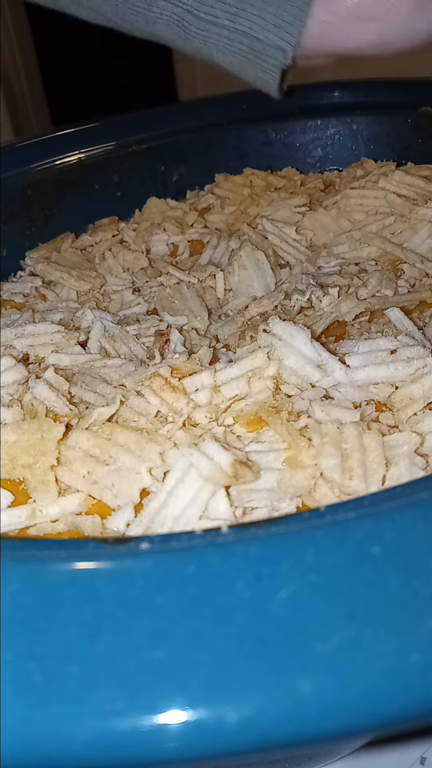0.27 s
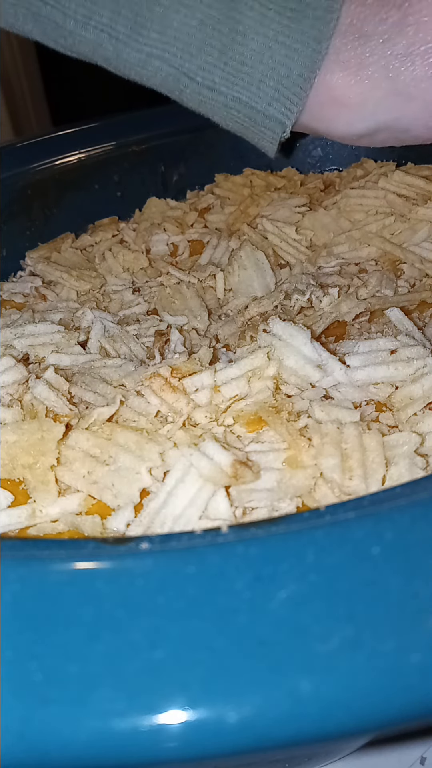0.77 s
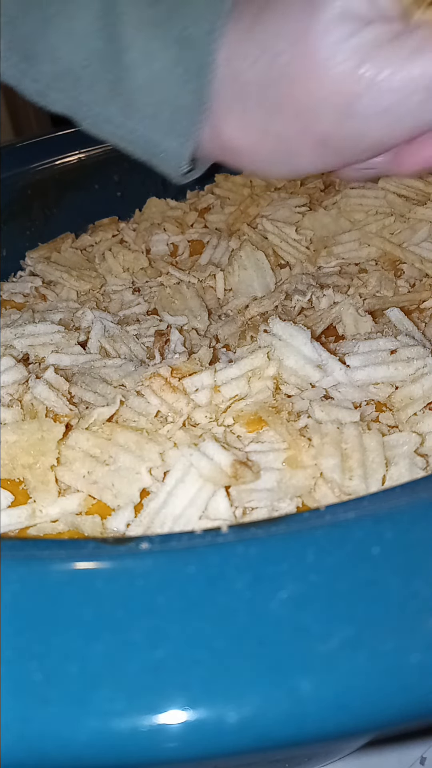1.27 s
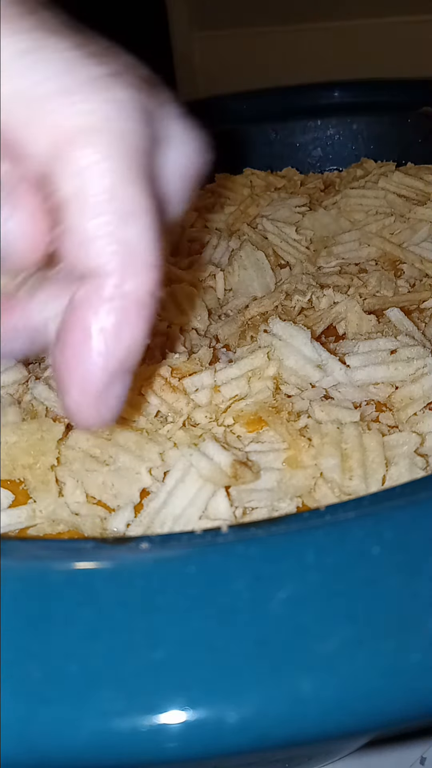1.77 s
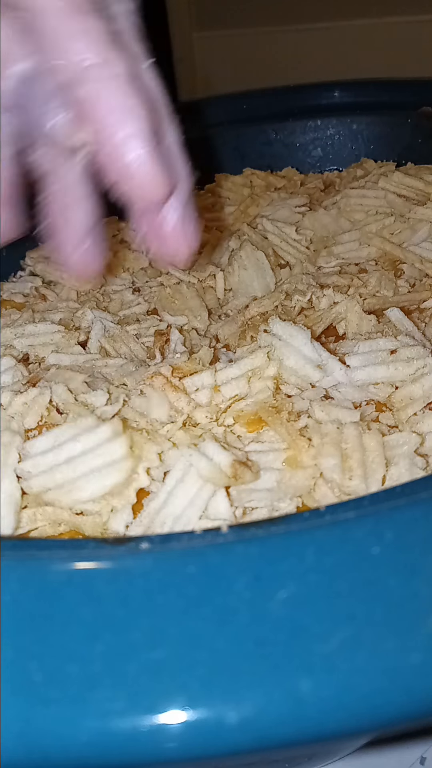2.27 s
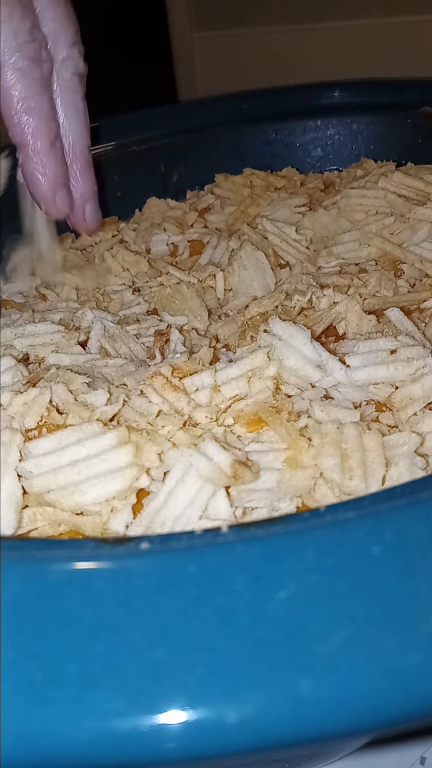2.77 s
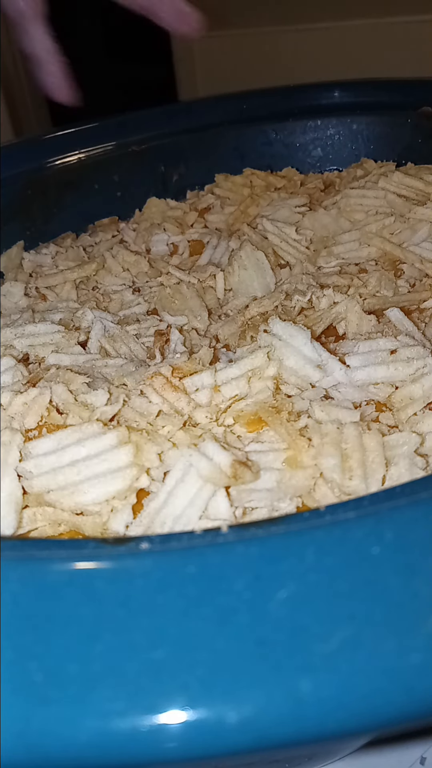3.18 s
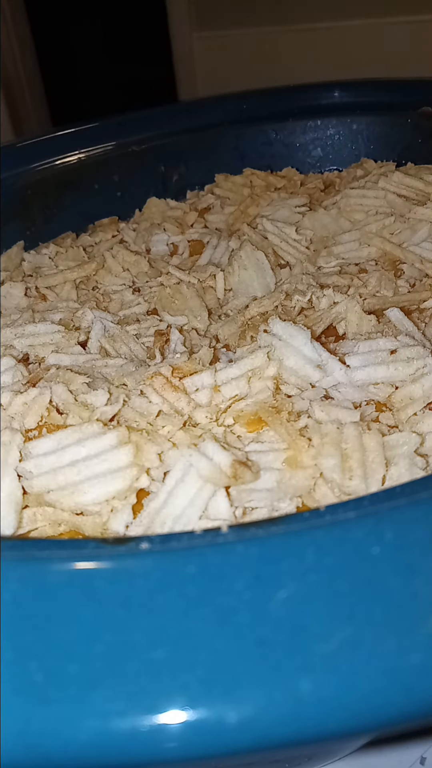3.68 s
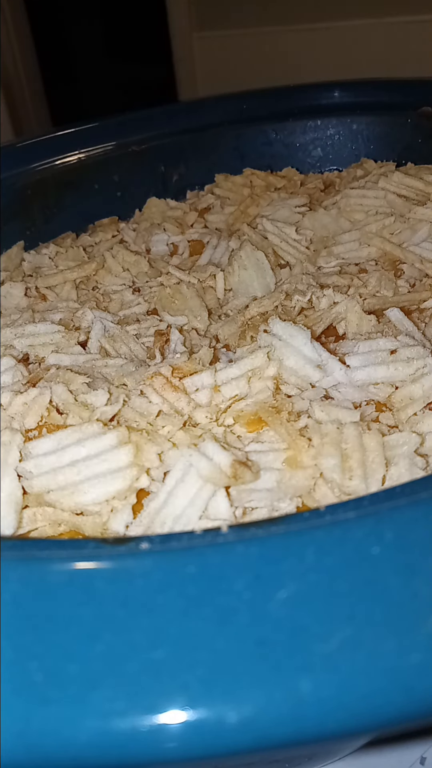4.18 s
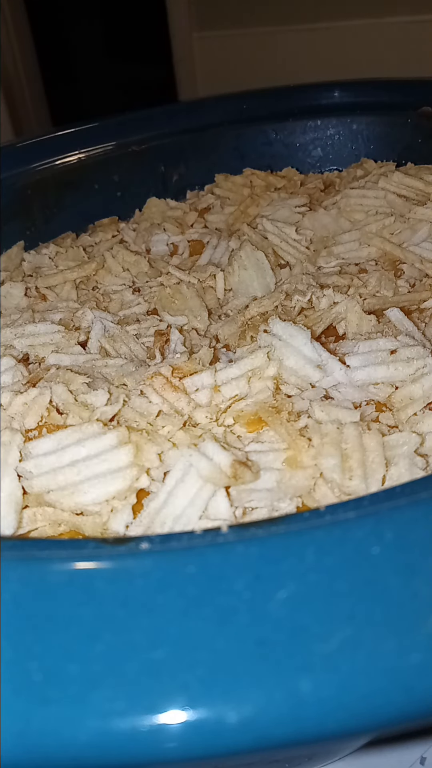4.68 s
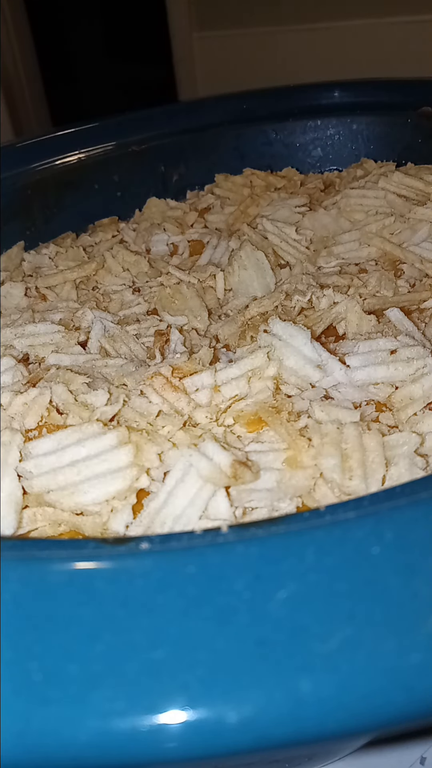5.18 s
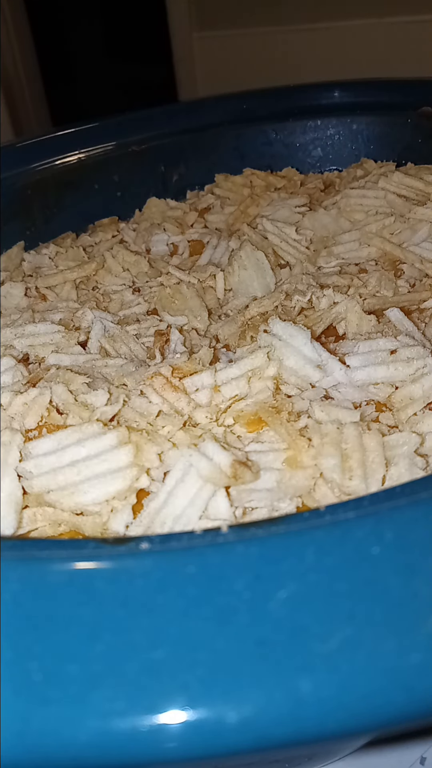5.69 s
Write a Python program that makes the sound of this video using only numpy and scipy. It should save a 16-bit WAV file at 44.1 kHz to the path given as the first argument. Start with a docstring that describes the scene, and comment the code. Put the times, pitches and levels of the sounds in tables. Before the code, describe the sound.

Quiet crumbly crackle and small flake drops give way to loud, brittle chip crushing by hand, thinning into scattered snaps at the end.

```python
"""Crisp chips are crushed in a heap by a hand, close by in a small kitchen: random breaks, in clumps,
drive click-and-mode filters in four bands, with single cracks and gliding tones, through moving resonances.
Before that, fingers rub crumbs loose over a dish (treble crackle and ticks), flakes drop (struck modes)
and a sleeve brushes past (filtered slips). A fingertip squeaks faintly, the hand bumps the container,
short diffuse tails give the room, and filtered noise gives a faint rumble and hiss."""
import sys
import numpy as np
from scipy import signal
from scipy.fft import rfft, irfft, next_fast_len
from scipy.io import wavfile
from scipy.ndimage import uniform_filter1d, map_coordinates

SR = 44100
rng = np.random.default_rng(int(sys.argv[2]) if len(sys.argv) > 2 else 0)


def output_pcm(signal):
    """Save a mono or channel-first signal as 16-bit PCM at the path in sys.argv[1].

    Samples are clipped to [-1, 1] before scaling.
    """
    pcm = np.clip(np.atleast_2d(signal).T, -1, 1) * 32767
    wavfile.write(sys.argv[1], SR, np.round(pcm).astype(np.int16))


N = 261072  # length in samples
TOP_HZ = 16100  # band limit, and the highest mode of a chip
SQUEEZE_ATTACK_S, SQUEEZE_SAG_DB_PER_S, SQUEEZE_RELEASE_DB_PER_S = 0.016, 7, 233.5

# Fingers rolling crumbs, easing off as the hand empties.
# Each row: time in seconds, relative level of the fine crackle in dB.
ROLLING = [(0.0, -56.5), (0.51, -61), (0.76, -56), (2.0, -70.5), (2.1, -93), (2.4, -86)]


def amp(db):
    """Logarithmic level: decibels become an amplitude ratio."""
    return 10 ** (np.asarray(db) / 20)


def unit(x):
    """Power normalisation: scale to rms 1."""
    return x / np.sqrt(np.mean(x ** 2) + 1e-20)


def along(points, hz):
    """Logarithmic frequency scale: read (Hz, value) points by linear interpolation on it."""
    f, v = np.transpose(points)
    return np.interp(np.log(hz + 1), np.log(f + 1), v)


def levels(rows):
    """Level envelope: gain per sample for each dB column, -120 dB outside the rows."""
    s, *columns = np.transpose(rows)
    t = np.arange(N) / SR
    return [amp(np.interp(t, s, column, left=-120, right=-120)) for column in columns]


def band(hz, lo_hz, hi_hz):
    """Band-pass response: gain with skirts of 24 dB per octave."""
    low_skirt = 1 + (lo_hz / (hz + 1)) ** 8
    high_skirt = 1 + (hz / hi_hz) ** 8
    return (low_skirt * high_skirt) ** -.5


def coloured(x, gain):
    """Minimum phase: a causal filter with the given gain over frequency keeps attacks sharp."""
    size = 4096
    cepstrum = irfft(np.log(np.maximum(gain(np.fft.rfftfreq(size, 1 / SR)), 1e-6)))
    # folding the cepstrum onto positive time makes the filter causal
    cepstrum[1:size // 2] *= 2
    cepstrum[size // 2 + 1:] = 0
    response = irfft(np.exp(rfft(cepstrum)))
    return signal.fftconvolve(x, response)[:len(x)]


def add(track, s, sound):
    """Superposition: mix a sound into the track at time s."""
    start = max(round(s * SR), 0)
    part = track[start:start + len(sound)]
    part += sound[:len(part)]


def burst(t60, size=4096):
    """Exponential decay: a puff of noise falls by 60 dB in t60 seconds."""
    return rng.standard_normal(size) * amp(-60 * np.arange(size) / SR / t60)


def ringing(pitch_hz, t60, t):
    """Damped oscillation: one struck mode starts smoothly and dies exponentially."""
    return np.sin(2 * np.pi * pitch_hz * t) * amp(-60 * t / t60) * (1 - np.exp(-t * pitch_hz))


def wobble(rate):
    """Slow random modulation: a smooth curve through random knots, rate knots a second."""
    knots = rng.standard_normal(N // 100)
    return map_coordinates(knots, [np.arange(N) * rate / SR], mode="mirror")


def fractures(rate, spread_db):
    """Random point process: breaks of either sign, rate a second, with log-normal sizes limited at one end."""
    happens = rng.random(N) < rate / SR
    sign = rng.choice([-1, 1], N)
    return happens * sign * amp(spread_db * np.minimum(rng.standard_normal(N), 2))


def chip(pitch_hz, spread, t60, click_db, count=7, size=1024):
    """Modal response: a break gives a sharp click and a few modes scattered around the piece's pitch."""
    t = np.arange(size) / SR
    hz = np.minimum(pitch_hz * np.exp(spread * rng.standard_normal((count, 1))), TOP_HZ)
    life = t60 * np.exp(0.3 * rng.standard_normal((count, 1)))
    strength = rng.standard_normal((count, 1))
    ring = (strength * np.sin(2 * np.pi * hz * t) * amp(-60 * t / life)).sum(0)
    click = burst(.001, size=size)
    return unit(ring) + amp(click_db) * unit(click)


def crackle(breaks, gain, pitch_hz, spread, t60, click_db, even_s, size=256):
    """Impulse excitation: breaks drive one piece, then the next; rms is evened to about 1 over even_s."""
    x, pitch = np.zeros(N), pitch_hz * np.ones(N)
    for i in range(0, N, size):
        piece = chip(pitch[i], spread, t60, click_db)
        add(x, i / SR, signal.fftconvolve(breaks[i:i + size], piece))
    x = unit(coloured(x, gain))
    span = max(int(even_s * SR), 1)
    power = uniform_filter1d(uniform_filter1d(x ** 2, span), span)
    return x / np.sqrt(np.abs(power) + 1e-3)


def splinters(breaks, gain, pitch_hz, even_s):
    """Heavy damping: the smallest fragments hardly ring, so clicks dominate their breaks."""
    return crackle(breaks, gain, pitch_hz, spread=.35, t60=.004, click_db=3, even_s=even_s)


def heap_colour(hz):
    """Resonance on a broad spectrum: the chips' colour with the peaks and dips of the hollow around them."""
    # The chips' broad spectrum. Each row: frequency in Hz, gain in dB.
    broad = [(35, -8), (60, 9), (146, -10.5), (207, -10.5), (363, -2.5), (480, -4), (636, -4.5), (715, -5),
             (1280, -4.5), (1910, 0), (2580, -1.5), (6280, -5), (9790, -26.5), (12100, -44), (16000, -35)]
    # Hollow of the hand and container. Each row: centre in Hz, width in Hz, change at the centre in dB.
    hollow = [(148, 42, 10), (362, 37, 4.5), (649, 21, 4), (717, 29, -18), (852, 32, 2.5), (990, 15, 0.5),
              (1288, 190, 6.5), (1890, 86, -16.5), (2590, 250, 4.5), (4820, 210, 4.5), (6220, 140, 6),
              (8900, 1450, 8), (13500, 800, -12), (15800, 3300, 18)]
    peaks_db = sum(db / (1 + (2 * (hz - centre) / width) ** 2) for centre, width, db in hollow)
    return amp(along(broad, hz) + peaks_db)


def crumb_colour(hz):
    """Size and pitch: small crumbs sound only in the treble."""
    # The crumbs' spectrum. Each row: frequency in Hz, gain in dB before the band edges.
    treble = [(3500, -8), (4600, -6), (5400, -4.5), (6200, -1.5), (8000, -6), (9200, 8), (9900, 7),
              (11300, -8.5), (13000, -18.5), (15200, -3.5), (16000, -10.5)]
    return amp(along(treble, np.maximum(hz, 3500))) * band(hz, 3700, 16400)


def press(start_s, hold_s, attack_s, sag_db_per_s, release_db_per_s):
    """Force envelope: a push builds, sags as the chips give way, and dies when the hand lets go."""
    t = np.maximum(np.arange(N) / SR - start_s, 0)
    fall_db = sag_db_per_s * np.minimum(t, hold_s) + release_db_per_s * np.maximum(t - hold_s, 0)
    return np.minimum(t / attack_s, 1) * amp(-fall_db)


def pinch(start_s, hold_s):
    """Force envelope of the fingertips: a quick push."""
    return press(start_s, hold_s, attack_s=0.013, sag_db_per_s=15.5, release_db_per_s=147)


def squeeze(start_s, hold_s):
    """Force envelope of the whole hand: a push with a steep release."""
    return press(start_s, hold_s, SQUEEZE_ATTACK_S, SQUEEZE_SAG_DB_PER_S, SQUEEZE_RELEASE_DB_PER_S)


def together(shapes, db):
    """Incoherent addition: pushes add in power, one gain curve for each column of their dB values."""
    return np.sqrt(amp(np.transpose(db)) ** 2 @ np.square(shapes))


def grinding(rows, cycles, release_db_per_s, rate, spread_db):
    """Driven resonance: tiny slips excite a gliding mode per row, dying by 60 dB in so many cycles."""
    out, t = np.zeros(N), np.arange(N) / SR
    slips = fractures(rate, spread_db)
    for s, hold_s, db, first_hz, last_hz in rows:
        span = slice(int(s * SR), int((s + hold_s + .2) * SR))
        pitch = np.interp(t[span], [s, s + hold_s], [first_hz, last_hz])
        turn = np.exp(2j * np.pi * np.cumsum(pitch) / SR)
        # a one-pole decay in a frame that turns with the pitch
        decay = amp(-60 * first_hz / cycles / SR)
        ring = signal.lfilter([1], [1, -decay], slips[span] / turn) * turn
        ring = coloured(ring.real, lambda hz: band(hz, first_hz / 1.4, first_hz * 1.4))
        push = press(s, hold_s, SQUEEZE_ATTACK_S, SQUEEZE_SAG_DB_PER_S, release_db_per_s)
        out[span] += amp(db) * push[span] * unit(ring)
    return out


def room_tone():
    """Filtered noise: a faint low rumble that wavers, with a little hiss."""
    # Background spectrum. Each row: frequency in Hz, gain in dB before the band edges.
    hush = [(15, -25), (25, -44), (64, 12), (161, 10.5), (229, -5), (354, -5), (936, -18.5), (1740, -16.5),
            (1940, -16.5), (8140, -21.5), (9840, -26), (11900, -31), (16000, -32)]
    rumble = unit(coloured(rng.standard_normal(N), lambda hz: amp(along(hush, hz)) * band(hz, 51, 234)))
    hiss = unit(coloured(rng.standard_normal(N), lambda hz: amp(along(hush, hz)) * band(hz, 238, 27000)))
    return amp(-70.5 + 1.1 * wobble(13)) * rumble + amp(-74.5) * hiss


def kitchen(x, size=8192):
    """Diffuse reverberation: noise tails die at their own rate per band."""
    # The room's decay. Each row: frequency in Hz, t60 in seconds.
    decay = [(150, 0.15), (1000, 0.18), (5000, 0.21), (9500, 0.14), (14000, 0.14)]
    out = np.zeros(N)
    # a fresh random tail for each block avoids a fixed colouring
    for i in range(0, N, size):
        hz, t, z = signal.stft(rng.standard_normal(SR // 3), SR, nperseg=256)
        fading = z * amp(-60 * t / along(decay, hz)[:, None])
        tail = signal.istft(fading, SR, nperseg=256)[1]
        tail = tail / np.linalg.norm(tail)
        add(out, i / SR + .004, signal.fftconvolve(x[i:i + size], tail))
    return out


def bumps():
    """Damped oscillation: soft, low knocks of the hand against the container."""
    # Each row: start in seconds, level in dB, pitch in Hz.
    knocks = [(2.641, -51, 89.5), (3.398, -27, 115), (4.068, -35, 150), (4.145, -33, 135),
              (4.309, -31, 151), (5.365, -31, 86.5)]
    out, t = np.zeros(N), np.arange(SR // 3) / SR
    envelope = amp(-60 * t / 0.093) * (1 - np.exp(-t / 0.0038))
    for s, db, pitch_hz in knocks:
        add(out, s, amp(db) * np.sin(2 * np.pi * pitch_hz * t) * envelope)
    return out


def squeak():
    """Friction-driven resonance: skin slipping on the glaze gives a narrow, wavering band of noise."""
    # A fingertip on the rim. Each row: start in seconds, hold in seconds, level in dB.
    slides = [(2.536, 0.047, -69), (2.74, 0.21, -73.5)]
    tone = coloured(rng.standard_normal(N), lambda hz: 1 / (1 + ((hz - 1810) / 45) ** 2))
    return sum(amp(db) * pinch(s, hold_s) for s, hold_s, db in slides) * unit(tone)


def sleeve():
    """Friction noise: ribbed cloth slips many times through a few broad resonances as it passes."""
    # The cloth's resonances. Each row: centre in Hz, width in Hz, gain in dB.
    resonances = [(1460, 240, -3.5), (4720, 500, 2), (6310, 990, 9)]
    # Passes over the dish. Each row: closest time in seconds, level in dB, seconds to fall by 10 dB.
    sweeps = [(0.705, -44.5, 0.12), (0.927, -38, 0.0038), (1.03, -58, 0.04)]
    swell = 0.66  # time to swell over time to fade

    def gain(hz):
        """Superposed resonances: the gains of the cloth's broad peaks add."""
        return sum(amp(db) / (1 + (2 * (hz - centre) / width) ** 2) for centre, width, db in resonances)

    t, passes = np.arange(N) / SR, np.zeros(N)
    for s, db, fall_s in sweeps:
        passes += amp(db - 10 * np.maximum(t - s, (s - t) / swell) / fall_s)
    return passes * unit(coloured(fractures(10000, spread_db=2.0), gain))


def sleeve_scrapes():
    """Slip-driven resonance: the sleeve scrapes over the topping, each catch with its own pitch."""
    # Each row: start in seconds, hold in seconds, level in dB, first pitch in Hz, last pitch in Hz.
    catches = [(0.13, 0.034, -58.5, 4650, 4550), (0.695, 0.045, -55.5, 1500, 1420),
               (0.753, 0.11, -64, 1330, 1270), (0.877, 0.059, -44.5, 6100, 6040),
               (0.95, 0.11, -58.5, 6200, 6280), (0.91, 0.15, -67, 1500, 1640)]
    return grinding(catches, cycles=30, release_db_per_s=398, rate=600, spread_db=5.0)


def drops():
    """Impact and rebound: a struck piece clicks, rings and chatters to rest; some ring the dish too."""
    # Modes of landing pieces; rows at about the same time are one piece. The last row is a chip
    # ringing loudly in the crush, played like a landing. Each row: start in seconds, level in dB,
    # pitch in Hz, ring t60 in seconds, click in dB before a common trim,
    # chatter in dB relative to the first contact.
    struck_modes = [(1.046, -39, 1600, 0.017, -2, -9), (1.049, -33, 2460, 0.011, -2, -22),
                    (1.403, -34.5, 1440, 0.02, -14, -10.5), (1.791, -19, 9170, 0.0089, -25, -47),
                    (1.7904, -26, 2950, 0.0052, -6, -19), (1.791, -22.5, 4330, 0.0059, -19, -28),
                    (1.985, -48.5, 1624, 0.022, -3.5, -1.5), (2.007, -37, 1370, 0.0097, -12, -22),
                    (2.311, -48, 1450, 0.013, -8, 0), (2.526, -40.5, 853, 0.04, 1, -3),
                    (2.742, -33.5, 544, 0.033, -3.5, -8), (2.80, -47, 508, 0.041, -12, -5),
                    (2.961, -40.5, 1316, 0.013, -12.5, -3), (3.059, -49, 710, 0.0087, -4, -2.5),
                    (4.85, -8, 1148, 0.014, -16.5, -26)]
    # Pieces that strike the dish. Each row: start in seconds, level in dB, tilt in dB per octave.
    taps = [(1.588, -38.5, 1), (1.791, -50.5, 3)]
    # The dish's modes. Each row: frequency in Hz, level in dB before the tilt, t60 in seconds.
    dish_modes = [(790, 1.5, 0.085), (2036, -5.5, 0.069), (2320, -7, 0.04), (2610, 1, 0.046)]
    out, t = np.zeros(N), np.arange(SR // 5) / SR
    for s, db, pitch_hz, t60, click_db, chatter_db in struck_modes:
        ring = ringing(pitch_hz, t60, t)
        click = coloured(burst(0.0093, size=len(t)),
                         lambda hz: band(hz, pitch_hz, 3.5 * pitch_hz) * heap_colour(hz) ** .5)
        strike = 0.72 * ring + amp(click_db - 3.5) * click / np.abs(click).max()
        contacts = (rng.random(len(t)) < 700 / SR) * rng.standard_normal(len(t))
        contacts = contacts * amp(chatter_db - 60 * t / 0.13)
        contacts[0] = 1  # the first contact
        add(out, s, amp(db) * signal.fftconvolve(contacts, strike))
    for s, db, tilt_db in taps:
        knock = coloured(burst(0.04, size=len(t)), lambda hz: band(hz, 1000, 3300))
        ring = sum(amp(mode_db + tilt_db * np.log2(hz / dish_modes[0][0])) * ringing(hz, t60, t)
                   for hz, mode_db, t60 in dish_modes)
        add(out, s, amp(db) * (amp(-3.0) * ring + amp(-1.0) * knock / np.abs(knock).max()))
    return out


def ticks():
    """Brittle fracture: crumbs part with a very short click; small ones come at random in the rolling."""
    # The clearest crumbs snapping off.
    # Each row: time in seconds, level in dB, body in dB, the level before a common trim.
    clear = [(0.1306, -33, -20), (0.1383, -34, -9), (0.2145, -31, -25), (0.2504, -37, 0),
             (0.5596, -31, -15), (0.6237, -27, -25), (0.6851, -23.5, -5), (1.2245, -32, -10),
             (1.2285, -31, -14), (1.2345, -32, -25), (1.2474, -31, -4), (1.2765, -32.5, -28),
             (1.314, -33, -25), (1.6587, -37, -8), (1.8517, -35.5, -20), (1.9829, -34, -27),
             (2.1284, -36.5, -16), (2.2704, -39.5, -5), (2.3095, -35.5, -21), (2.33, -39, -8),
             (2.341, -40, -15), (2.4747, -37.5, -3), (2.528, -35.5, -4), (2.743, -40.5, 20)]
    # The ticks' top changes as the hand turns away. Each row: time in seconds, dB above sheen_hz.
    sheen = [(0.7, 1), (1.25, 9), (2.15, -4.5)]
    sheen_hz = 11100
    small_per_s, small_body_db = 16, -20
    above_rolling_db, small_spread_db = 23, 3  # before the same trim
    out, rolling = np.zeros(N), levels(ROLLING)[0]
    small = []
    for i in np.flatnonzero(rng.random(N) < small_per_s / SR):
        if i / SR < ROLLING[-1][0]:
            rolling_db = 20 * np.log10(rolling[i])
            db = rolling_db + above_rolling_db + small_spread_db * rng.standard_normal()
            small.append((i / SR, db, small_body_db))
    for s, db, body_db in list(clear) + small:
        sheen_db = np.interp(s, *np.transpose(sheen))

        def gain(hz):
            """Spectral balance: treble with its sheen, plus the body below."""
            top = crumb_colour(hz) * amp(sheen_db * band(hz, sheen_hz, SR))
            return top + amp(body_db) * band(hz, 1200, 3700)

        click = coloured(burst(.009), gain)
        add(out, s + 0.00089, amp(db - 5.5) * click / np.abs(click).max())
    return out


def rubbing():
    """Fracture rate follows force: harder rubbing breaks more crumbs each second."""
    # Firmer pinches that grind crumbs. Each row: start in seconds, hold in seconds,
    # fine crackle and flake rustle as relative levels in dB.
    pinches = [(0.55, 0.017, -44, -57), (0.622, 0.087, -41, -57), (0.68, 0.028, -48, -46),
               (0.905, 0.025, -44, -69), (1.0, 0.062, -52, -70), (1.222, 0.026, -55.5, -71),
               (1.982, 0.048, -57, -68)]
    # Fingertips spreading the topping: start in seconds, hold in seconds,
    # fine crackle and flake rustle as relative levels in dB.
    spreading = (2.5, 2, -73, -65.5)
    rolling = amp(1) * levels(ROLLING)[0]
    strokes = list(pinches) + [spreading]
    shapes = [pinch(*row[:2]) for row in strokes]
    fine, flakes = together(shapes, [row[2:] for row in strokes])
    fine = np.hypot(fine, rolling)
    flakes = np.hypot(flakes, amp(-3) * rolling)
    breaks = fractures(700 + 4000 * fine / fine.max(), spread_db=-2)
    sparkle = splinters(breaks, crumb_colour, pitch_hz=7680, even_s=0.14)
    rustle = crackle(breaks, lambda hz: heap_colour(hz) * band(hz, 400, 5500), pitch_hz=1868,
                     spread=.6, t60=0.039, click_db=4.0, even_s=0.034)
    return amp(-2.5) * fine * sparkle + amp(-9.0) * flakes * rustle


def piece_grinding():
    """Slip-driven resonance: a large piece rings with gliding pitch while it is ground down."""
    # Each row: start in seconds, hold in seconds, level in dB, first pitch in Hz, last pitch in Hz.
    pieces = [(3.655, 0.074, -40, 1310, 1280), (3.99, 0.15, -41, 1300, 1263), (4.62, 0.04, -37, 1330, 1200),
              (4.74, 0.035, -42, 1500, 1440), (4.806, 0.1, -37, 1086, 1253), (4.885, 0.08, -41, 1570, 1750),
              (4.955, 0.042, -41, 1020, 1010), (5.35, 0.034, -43, 5200, 5200),
              (5.765, 0.024, -47, 4660, 4430)]
    return grinding(pieces, cycles=28, release_db_per_s=523, rate=900, spread_db=4)


def cracks():
    """Sudden fracture: a chip snaps, showers splinters, and the piece left over rings."""
    # Whole chips cracking. Each row: time in seconds, level in dB,
    # splinter treble in dB before fixed offsets, pitch in Hz.
    chips = [(3.141, -41, -22, 420), (3.158, -38, -28, 644), (3.184, -35, -27, 1600),
             (3.251, -22, -23, 2060), (3.2753, -20, -12, 2345), (3.32, -27, -24, 2080),
             (3.339, -20, -29, 1450), (3.361, -19, -6, 1130), (3.389, -17, -11, 1120),
             (3.411, -14.5, -7, 1200), (3.421, -16, -7, 2380), (3.429, -19.5, -8, 1240),
             (3.466, -20, -18, 1240), (3.487, -19, -29, 1430), (3.53, -18, -8, 1260), (3.545, -21, 4, 5000),
             (3.572, -18.5, -20, 2070), (3.606, -21, -12, 1302), (3.6555, -15.5, -5, 1290),
             (3.727, -22, -12, 1297), (3.764, -21, -13, 1260), (3.847, -20.5, -15, 965),
             (4.047, -21, -19, 1170), (4.104, -21.5, -20, 1330), (4.257, -33.5, -28, 1290),
             (4.286, -26, -40, 1270), (4.322, -21.5, -26, 1180), (4.443, -21.5, -13, 1050),
             (4.518, -19.5, -12, 2570), (4.741, -25.5, -31, 1460), (4.816, -24, -28, 1140),
             (4.898, -21.5, -32, 1190), (4.941, -25.5, -33, 1760), (5.056, -33, -21, 1270),
             (5.098, -28.5, -21.5, 2250), (5.17, -25, -23, 1250), (5.347, -28, -11, 3500),
             (5.358, -22, -4, 1415), (5.444, -34.5, -12, 2500), (5.457, -30, -10, 2640),
             (5.501, -21, -13, 2660), (5.515, -22.5, -10, 2160), (5.542, -22.5, -19, 1210),
             (5.567, -24, -14.5, 1310), (5.591, -27, -17, 2240), (5.601, -24.5, -27, 2120),
             (5.683, -32.5, -23, 1510), (5.769, -22, 0, 6230), (5.833, -39, -31, 1320),
             (5.874, -41, -22, 2410), (5.907, -23, -25.5, 2180)]
    # Cracks lose their body as the hand lifts off the heap. Each row: time in seconds, low end in dB.
    body = [(4.9, -5), (5.2, -26)]
    ring_t60_s, ring_db = 0.018, -2
    out, t = np.zeros(N), np.arange(4096) / SR
    for s, db, splinter_db, pitch_hz in chips:
        body_db = np.interp(s, *np.transpose(body))
        tilt = [(400, body_db), (900, 0), (2500, 0), (4500, splinter_db + 8.5),
                (7000, splinter_db + 17.0), (10000, splinter_db + 6.0)]  # (Hz, dB)
        snap = chip(pitch_hz=2104, spread=0.598, t60=0.0062, click_db=0.5, size=len(t))
        shower = amp(-3) * unit(burst(.07))
        crack = coloured(snap + shower, lambda hz: heap_colour(hz) * amp(along(tilt, hz)))
        overtone = ringing(pitch_hz * rng.uniform(1.2, 1.89), ring_t60_s / 2, t)
        ring = ringing(pitch_hz, ring_t60_s, t) + amp(-5) * overtone
        crack = crack / np.abs(crack).max() + amp(ring_db) * ring
        add(out, s + 0.001027, amp(db) * crack / np.abs(crack).max())
    return out


def crushing():
    """Avalanches of fracture: breaks come in clumps, splinter, ring flakes and thud through the heap."""
    # Squeezes of the heap. Each row: start in seconds, hold in seconds, flake crunch, splinters and
    # muffled crunch as relative levels in dB, flake pitch at mid-hold in Hz.
    squeezes = [(3.135, 0.045, -50, -56.5, -43.5, 1270), (3.247, 0.019, -37, -42.5, -39.5, 2080),
                (3.337, 0.069, -37, -38.5, -37.5, 1533), (3.388, 0.12, -34, -33.5, -35, 1440),
                (3.525, 0.11, -35, -35, -38, 1330), (3.653, 0.26, -36, -36.5, -36.5, 1267),
                (3.975, 0.058, -37.5, -41.5, -37.5, 1450), (4.04, 0.075, -36, -41.5, -36.5, 1305),
                (4.279, 0.069, -36, -46.5, -34.5, 1220), (4.319, 0.11, -34, -40, -39, 1114),
                (4.42, 0.23, -33.5, -35, -42.5, 1502), (4.567, 0.031, -36.5, -40, -34.5, 1350),
                (4.739, 0.031, -41.5, -43, -53.5, 1320), (4.805, 0.16, -38.5, -47.5, -43.5, 1230),
                (5.16, 0.031, -40, -37, -46.5, 1436), (5.339, 0.017, -39, -39, -55, 1840),
                (5.44, 0.037, -49.5, -53, -71, 1560), (5.494, 0.021, -36.5, -34.5, -58, 1910),
                (5.541, 0.099, -43, -46.5, -57.5, 1890), (5.76, 0.013, -47.5, -43.5, -68, 1820)]
    # The heap keeps creaking under the hand: start in seconds, hold in seconds,
    # flake crunch, splinters and muffled crunch as relative levels in dB.
    creaking = (3.5, 2, -43, -49.5, -49.5)
    # The crushed heap settles as the hand opens: the same columns, in seconds and relative dB.
    settling = (5.5, 0.25, -52.5, -62, -66.5)
    # A brittle chip bursting into fine grit. Each row: start in seconds, relative level in dB.
    sprays = [(3.412, -41), (4.439, -39.5), (4.515, -45), (5.164, -40.5), (5.345, -46.5), (5.76, -47.5)]
    # The packed heap passes more bass to the container. Each row: time in seconds, bass gain in dB.
    packing = [(3.7, -9.5), (4.15, 0)]
    packed_below_hz = 177
    spray_s, grit_db, trickle_db = 0.0073, -18.5, -57.5  # grit_db is relative to the splinters
    pitch_rise_oct_per_s = 1.2  # within a squeeze the pieces get smaller and ring higher

    pushes = [squeeze(*row[:2]) for row in squeezes]
    leaning = press(*creaking[:2], SQUEEZE_ATTACK_S, 3.5, SQUEEZE_RELEASE_DB_PER_S)
    shapes = pushes + [leaning, squeeze(*settling[:2])]
    push_db = [row[2:5] for row in squeezes] + [creaking[2:], settling[2:]]
    crunch, splinter, muffled = together(shapes, push_db)
    grit = together([squeeze(s, spray_s) for s, db in sprays], [db for s, db in sprays])
    grit = np.hypot(grit, amp(grit_db) * splinter)
    # fine grit trickles through the fingers while the hand leans
    grit = np.hypot(grit, amp(trickle_db) * leaning)

    # flake pitch is averaged over the squeezes, weighted by their squared envelopes
    t, weights = np.arange(N) / SR, np.square(pushes) + 1e-12
    glides = []
    for s, hold_s, *_, hz in squeezes:
        from_middle_s = np.clip(t - s, 0, hold_s) - hold_s / 2
        glides.append(hz * 2 ** (pitch_rise_oct_per_s * from_middle_s))
    pitch = np.average(glides, axis=0, weights=weights)

    # one break sets off its neighbours, so they come in clumps
    clumps = amp(4 * wobble(110))
    breaks = fractures(clumps * (550 + 1300 * crunch / crunch.max()), spread_db=3.0)
    fine = splinters(breaks, lambda hz: crumb_colour(hz) * band(hz, 5400, 22000),
                     pitch_hz=10540, even_s=0.027)
    high = splinters(breaks, lambda hz: heap_colour(hz) * band(hz, 2320, 9700),
                     pitch_hz=4570, even_s=0.029)
    mid = crackle(breaks, lambda hz: heap_colour(hz) * band(hz, 727, 2910), pitch_hz=pitch,
                  spread=0.343, t60=0.0091, click_db=-1.0, even_s=0.01)
    low = crackle(breaks, lambda hz: heap_colour(hz) * band(hz, 91.5, 1000), pitch_hz=380.0,
                  spread=0.7, t60=0.02, click_db=3.5, even_s=0.031)
    bass = coloured(low, lambda hz: band(hz, 0, packed_below_hz))
    above_bass = coloured(low, lambda hz: band(hz, packed_below_hz, SR))
    low = above_bass + amp(np.interp(t, *np.transpose(packing))) * bass

    # the heap gives way in jerks
    jerks = amp(0.84 * wobble(45))
    treble = amp(-2.5) * grit * fine + amp(-3) * splinter * high
    return jerks * (treble + amp(-3.5) * crunch * mid + amp(-2.5) * muffled * low)


def resonate(x, hz, db):
    """Resonant filtering: what one resonance adds to the sound, or takes from it."""
    # a resonance widens by a share of its pitch
    width_hz = (57 + 0.025 * hz) / amp(db / 2)
    return (amp(db) - 1) * signal.lfilter(*signal.iirpeak(hz, hz / width_hz, SR), x)


def cupped(x):
    """Cavity resonance: each grip of the hand lifts or swallows a few pitches, fading in and out."""
    # The hollow of the cupped hand. Each row: start in seconds, end in seconds,
    # list of resonances (pitch in Hz, change in dB).
    grips = [(3.65, 3.92, [(140, -6), (1020, 4.5), (1540, -6), (2600, 3.5)]), (3.95, 4.201, [(170, 4),
             (600, 3.5), (1540, -3), (2330, -7), (2600, 6), (3270, 10)]), (4.27, 4.423, [(355, 4), (600, 4),
             (860, 4), (4850, -6)]), (4.436, 5.03, [(150, 3.5), (425, 5), (650, 3), (3730, 5.5)]),
             (5.148, 5.301, [(420, 9), (1270, 6.5), (1560, -5), (2150, 6.5), (4830, -7)]),
             (5.328, 5.447, [(2320, 7), (3850, 6.5), (6600, -7), (8250, 9)]), (5.48, 5.697, [(1150, 3.5),
             (2200, 3.5), (3350, 5), (5900, 4), (6600, -16)]), (5.74, 5.85, [(3600, -6), (6230, 6.5)])]
    fade_s = 0.03
    t = np.arange(N) / SR
    for start_s, end_s, resonances in grips:
        held = np.clip(.5 + np.minimum(t - start_s, end_s - t) / fade_s, 0, 1)
        for hz, db in resonances:
            x = x + held * resonate(x, hz, db)
    # the dish's wall partly cancels one pitch
    return x + resonate(x, 1910, -6)


def scene():
    """Direct and reverberant sound: crumbs are near; the heap is further off, wetter and cupped by the hand."""
    near = rubbing() + sleeve() + ticks() + drops() + squeak() + sleeve_scrapes()
    far = cupped(crushing() + cracks() + piece_grinding()) + bumps()
    reverberant = kitchen(amp(-11.0) * near + amp(-4.5) * far)
    return (near + far + reverberant + room_tone())[None]


def record(dry):
    """Soft saturation and band limiting: the loudest peaks are rounded, nothing from TOP_HZ up is kept."""
    rounded = dry / (1 + (dry / amp(-15.5)) ** 4) ** .25
    size = next_fast_len(N + SR // 2)
    kept = np.fft.rfftfreq(size, 1 / SR) < TOP_HZ
    return irfft(rfft(rounded, size) * kept, size)[:, :N]


dry = scene()
out = record(dry)
output_pcm(out)
```